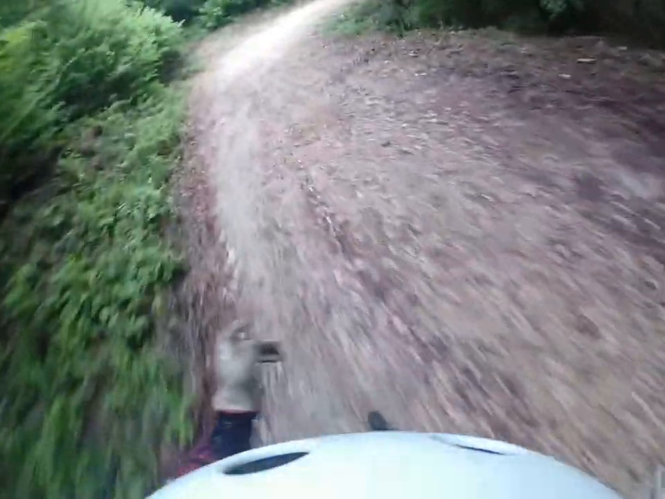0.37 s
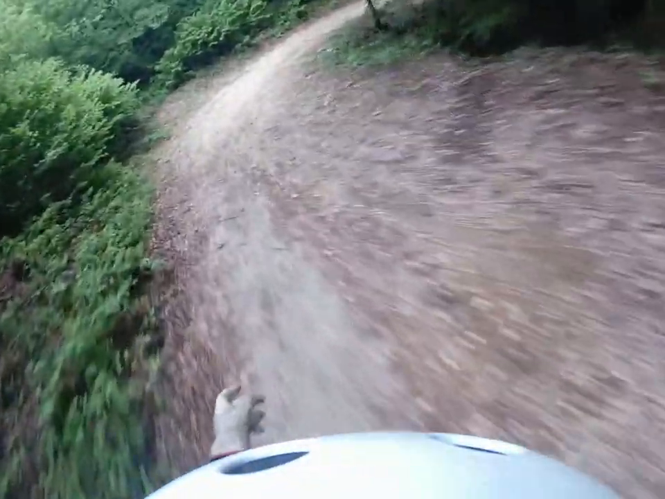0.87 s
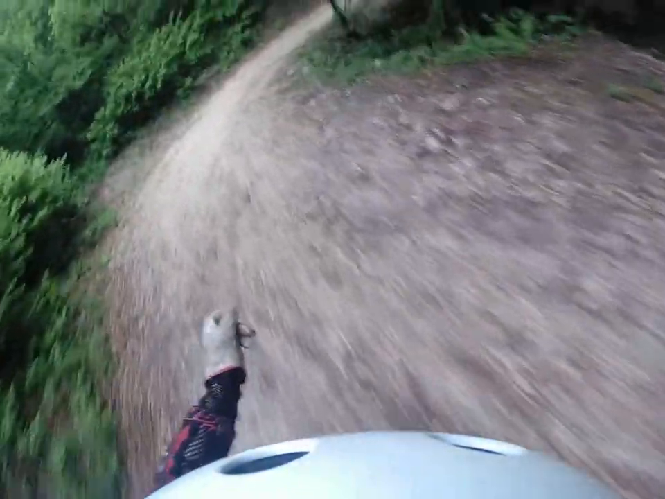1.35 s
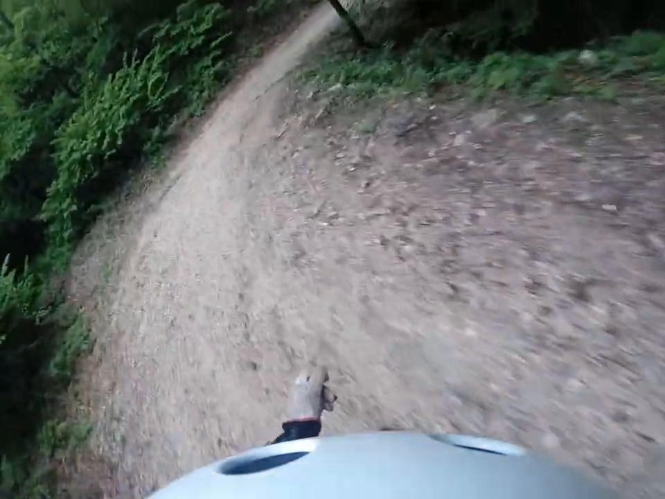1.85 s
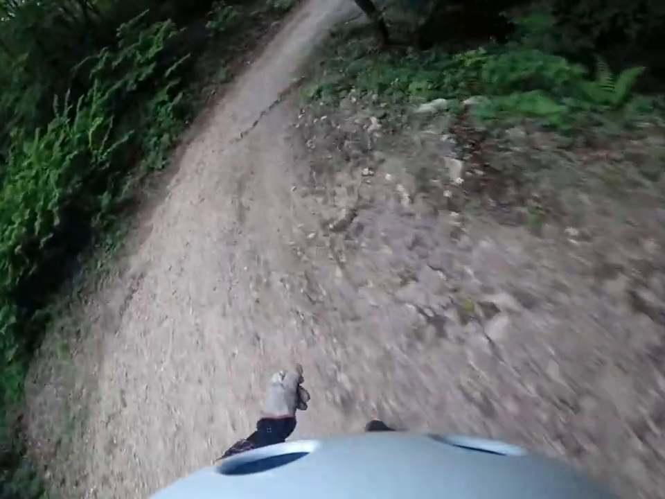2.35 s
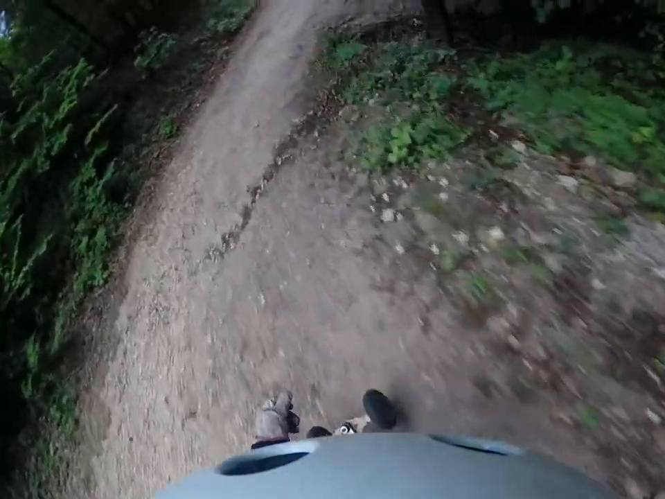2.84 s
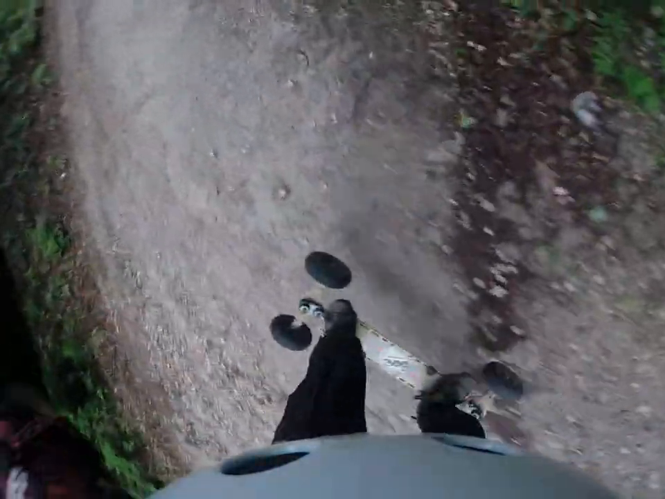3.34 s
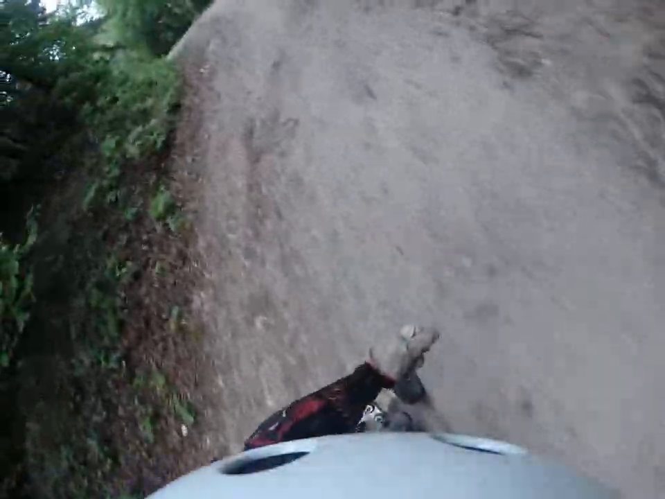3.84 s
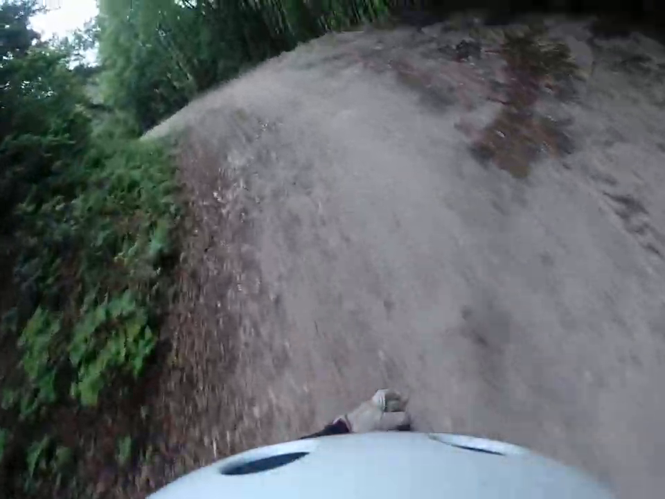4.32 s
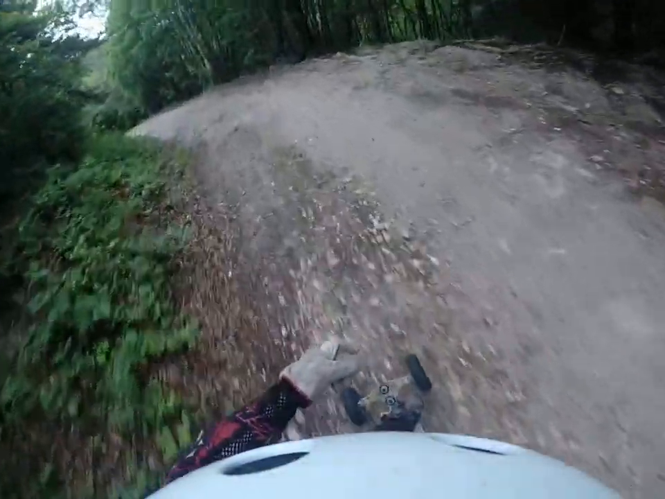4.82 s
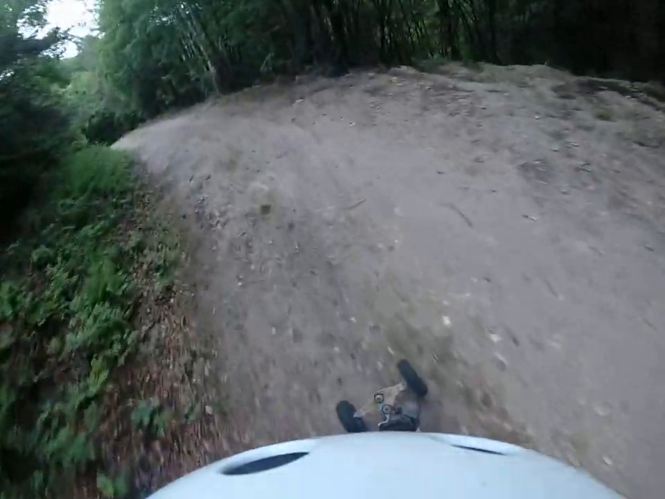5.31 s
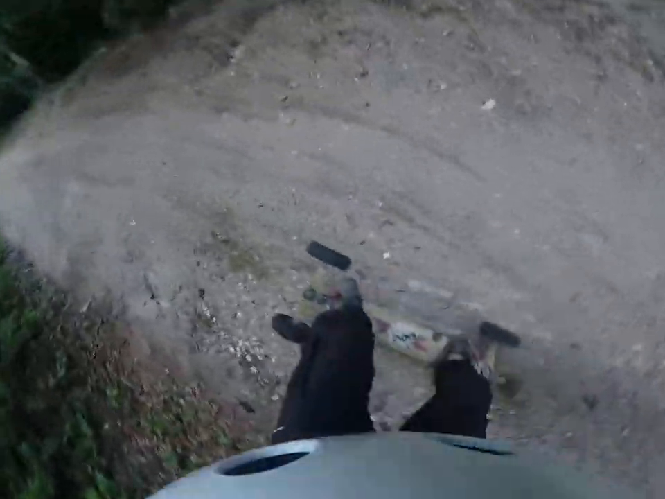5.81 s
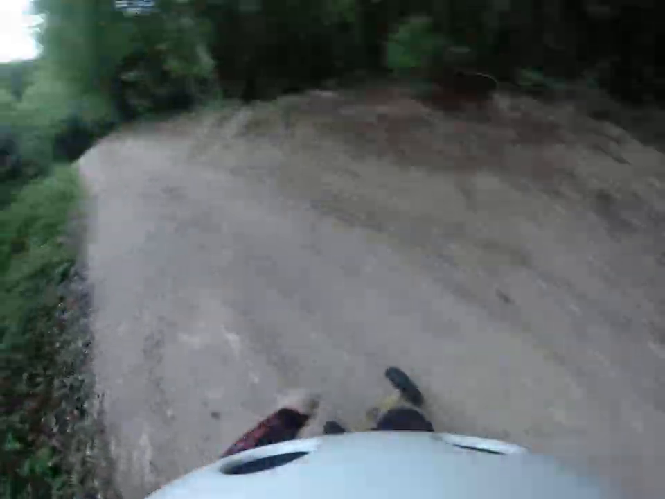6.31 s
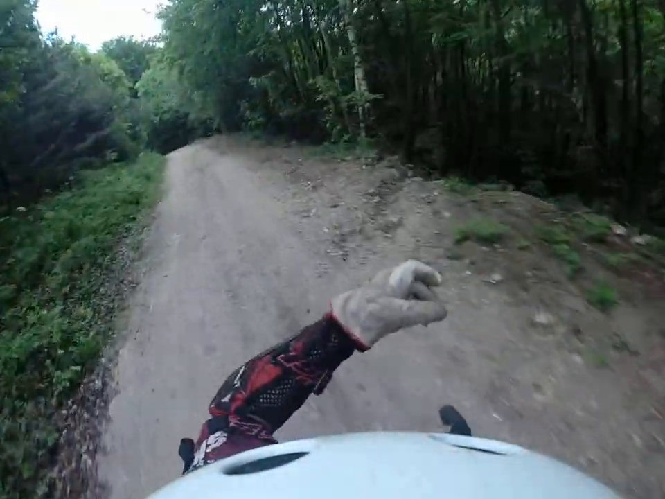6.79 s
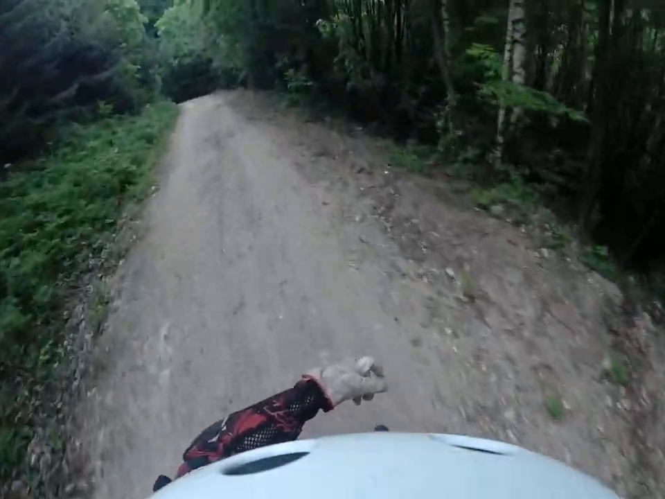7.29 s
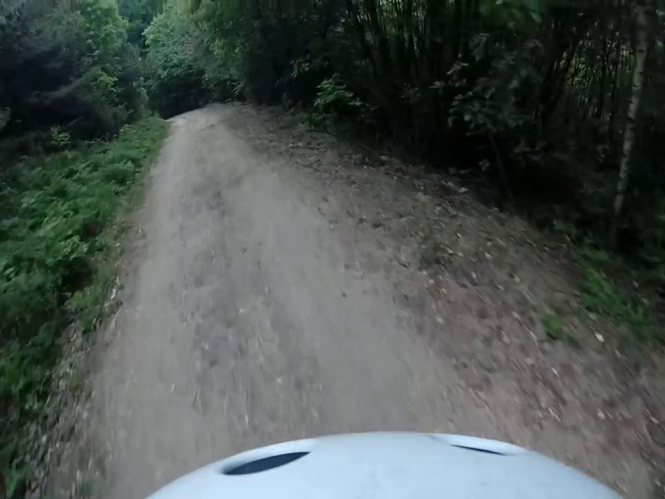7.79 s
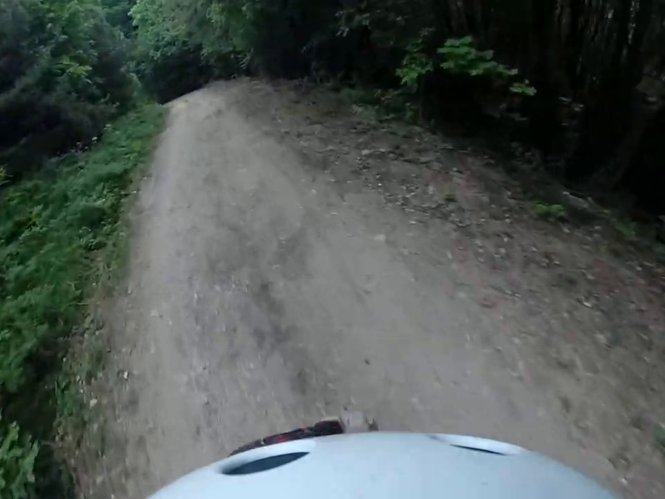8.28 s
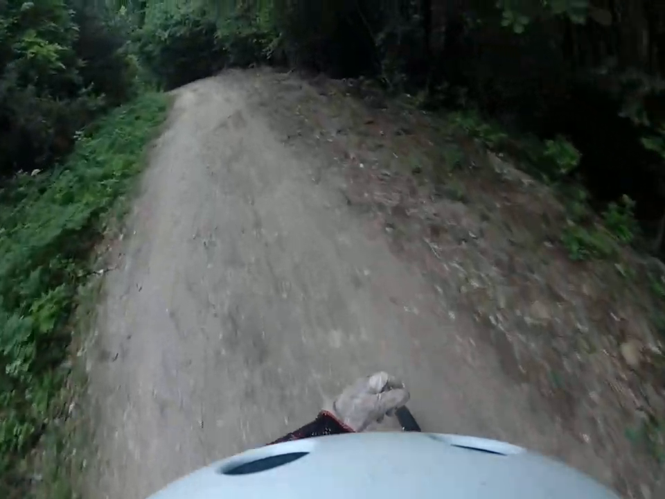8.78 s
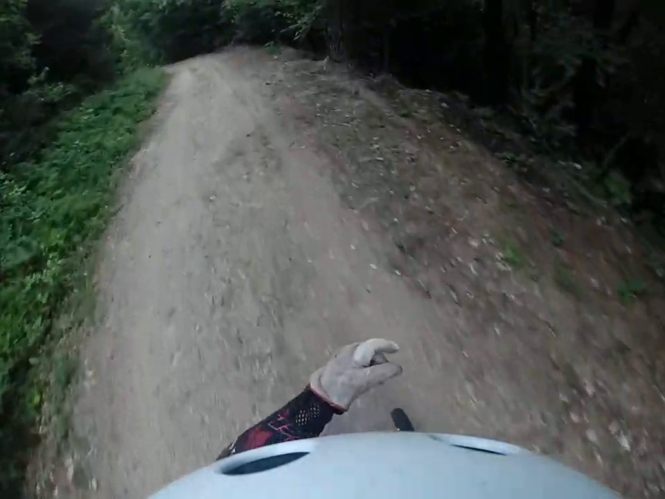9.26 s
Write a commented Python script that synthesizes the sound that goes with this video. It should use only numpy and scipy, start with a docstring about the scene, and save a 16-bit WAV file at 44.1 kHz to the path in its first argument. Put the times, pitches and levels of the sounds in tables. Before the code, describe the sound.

Close, boxy and dull-edged sound of rubber tyres grinding along dirt and loose stones outdoors. Continuous low shaking flutters beneath steady crunching and hissy grit. Irregular deep bumps boom and ring, while small stones tick, knock and clack. Strong hits come near three and a half, four and six seconds; afterwards the ride calms, pressing harder into the gravel around eight seconds before thin hoarse squeaks.

```python
"""Board on a gravel trail

A gravel trail heard from a rider's helmet camera, microphone inside its closed housing, as a board rolls.
Tyres rumble, crunch and throw grit: coloured noise broken into grains, louder as the rider presses down.
Bumps come up through the body as bell-shaped pushes that sway and ring the camera mount; shaking blurs both.
Stones knock and clack on the deck in decaying bursts, dulled by the resonant shell. Late on, a rubber part
squeaks in three brief slips, as sagging hoarse sines.
"""
import sys
import numpy as np
from scipy import signal
from scipy.fft import rfft, irfft, next_fast_len
from scipy.io import wavfile
from scipy.ndimage import uniform_filter1d, map_coordinates

SR = 44100
rng = np.random.default_rng(int(sys.argv[2]) if len(sys.argv) > 2 else 0)


def dump(signal):
    """Clip the signal to [-1, 1] and save it as 16-bit WAV at the path in sys.argv[1]."""
    limited = np.clip(np.atleast_2d(signal).T, -1, 1)
    pcm = np.round(limited * 32767).astype(np.int16)
    wavfile.write(sys.argv[1], SR, pcm)


def gain_from_db(level_db):
    """Convert decibel levels to linear amplitude factors (20 dB per decade)."""
    decades = np.asarray(level_db, float) / 20
    return 10 ** decades


N = 425124


def unit(x):
    """Scaled to rms 1."""
    return x / np.sqrt(np.mean(x ** 2) + 1e-20)


def curves(rows):
    """One value per sample for each column after the time."""
    s, *columns = np.transpose(rows)
    return [np.interp(np.arange(N) / SR, s, column) for column in columns]


def wobble(rate):
    """A smooth random curve, rate knots a second."""
    knots = rng.standard_normal(int(N * rate / SR) + 4)
    return map_coordinates(knots, [np.arange(N) * rate / SR])


def filtered(x, response):
    """x times a complex response of frequency."""
    m = next_fast_len(N + SR // 2)
    return irfft(rfft(x, m) * response(np.fft.rfftfreq(m, 1 / SR)), m)[..., :N]


def colour(points):
    """Gain through (f/Hz, level/dB) points on a log frequency axis, almost nothing outside them."""
    f, db = np.transpose(points)
    return lambda hz: gain_from_db(np.interp(np.log(hz + 1), np.log(f), db, left=-120, right=-120))


def mode(centre_hz, width_hz):
    """One resonance, gain 1 at its centre."""
    return lambda f: 1j * f * width_hz / (centre_hz ** 2 - f * f + 1j * f * width_hz)


def grains(rate, spread_db, life, smooth):
    """Noise of rms 1: short bursts of uneven size, rate a second and life seconds, on a smooth share."""
    chance, size = rng.random((int(rate * N / SR), 2)).T
    kicks = np.bincount((chance * N).astype(int), gain_from_db(-spread_db * np.log(1 - size)), N)
    burst = signal.lfilter([1], [1, -np.exp(-1 / (life * SR))], kicks)
    return unit((unit(burst) + smooth) * rng.standard_normal(N))


def band(noise, t, hz, size):
    """Noise slowed by two running means and lifted to a band around hz."""
    slow = uniform_filter1d(noise, size, axis=1)
    slow = unit(uniform_filter1d(slow, size, axis=1))
    return slow * np.sin(2 * np.pi * hz[:, None] * t)


def strikes(s, db, t60, attack, carrier):
    """Bursts falling 60 dB in t60 seconds, one per time, on a carrier of (random rows, time)."""
    t = np.arange(SR // 20) / SR
    envelope = gain_from_db(db[:, None] - 60 * t / t60) * (1 - np.exp(-t / attack))
    rows = envelope * carrier(rng.standard_normal((len(s), len(t))), t)
    at = (s * SR).astype(int)[:, None] + np.arange(len(t))
    return np.bincount(at.ravel(), rows.ravel(), N)[:N]


def small(level_db, count, over_db, low_hz, high_hz, spread_db):
    """Random small strikes (s, dB, Hz), denser and louder where their gravel level is high."""
    chance, pitch, size = rng.random((count, 3)).T
    passed = np.cumsum(gain_from_db(level_db[:-SR // 10]))
    at = np.searchsorted(passed, chance * passed[-1])
    db = level_db[at] + over_db - spread_db * np.log(1 - .95 * size)
    return at / SR, db, low_hz * (high_hz / low_hz) ** pitch


# resonances of the closed housing around the microphone: [f/Hz, width/Hz, level/dB]
SHELL_MODES = [(313.6, 23, -6.5), (604, 39, -4.5), (853, 23, -6.5), (1626, 470, -3), (2150, 69, -7.5),
               (2408, 200, 2), (2760, 320, -2.5), (4125, 440, -4), (4500, 57, -6), (6010, 840, -5)]


def housing(x):
    """Outside sound reaches the microphone directly and through the resonances of the shell."""
    return filtered(x, lambda f: 0.69 + sum(gain_from_db(db) * mode(hz, w)(f) for hz, w, db in SHELL_MODES))


# the rider presses the wheels into the gravel: [middle t/s, length t/s, load level/dB]
PRESSES = [(0.124, 0.37, 6.5), (0.53, 0.29, 4.5), (0.925, 0.29, 5.5), (1.397, 0.28, 4.5), (1.895, 0.29, 5),
           (2.35, .3, 7), (2.71, 0.24, 5), (3.187, 0.26, 5), (3.666, 0.12, 9), (3.96, 0.22, 3),
           (4.56, 0.27, 3), (5.16, 0.33, 3), (5.756, 0.11, 2.5), (6.318, .14, 8), (6.685, 0.9, 3),
           (7.12, 0.18, 4.5), (7.45, 0.32, 4), (8.141, 0.69, 5.5)]
# wheels light or off the ground: [from t/s, to t/s, drop in level/dB]
HOPS = [(3.386, 3.59, 2.5), (5.82, 6.266, 6)]


def load():
    """Weight on the wheels: the rise in dB in each press and the drop in dB in each hop."""
    edge, lift_s, land_s = 2.05, 0.11, .005  # squareness of a press; time to lift off and to land
    t = np.arange(0, N, 32) / SR
    press = sum(g * np.exp(-np.abs(2 * (t - s) / length) ** edge) for s, length, g in PRESSES)
    hop = sum(g * np.clip((t - a) / lift_s, 0, 1) * np.clip((b - t) / land_s, 0, 1) for a, b, g in HOPS)
    return [np.interp(np.arange(N) / SR, t, v) for v in (press, hop)]


# rolling with the rider's weight at rest: [t/s, crunch level/dB, grit level/dB]
ROLLING = [(0, -48, -54.5), (0.7, -48, -55), (1.15, -49.5, -57), (2.1, -47.5, -53), (2.6, -47.5, -51),
           (3.1, -48, -53.5), (4.1, -48.5, -54.5), (4.8, -51.5, -61.5), (5.6, -50, -58), (6.5, -53, -58.5),
           (7.6, -51.5, -61), (8.4, -51.5, -61.5), (8.65, -47, -57), (9.05, -49.5, -59.5), (9.64, -50, -59)]


def gravel_levels():
    """Low crunch, high crunch and grit in dB: load lifts the brighter parts more, a hop drops all alike."""
    crunch_db, grit_db = curves(ROLLING)
    press, hop = load()
    low_db = crunch_db + .5 * press - hop
    high_db = crunch_db - 1.5 + 1.24 * press - hop
    return low_db, high_db, grit_db + 0.92 * press - hop


def layer(source, spectrum):
    """A source through its colour and the housing, rms 1."""
    return unit(housing(filtered(source, colour(spectrum))))


# colour of the rolling rumble: [f/Hz, level/dB per Hz]
RUMBLE_COLOUR = [(60, -13), (110, -5), (200, -9.5), (400, -15.5), (900, -19.5), (1500, -29.5), (3000, -66)]
# colours of the low and the high crunch, a list for each: [f/Hz, level/dB per Hz]
CRUNCH_COLOURS = [
    [(500, -11), (1100, -2), (1600, 3), (2000, -3), (2600, -50.5)],
    [(1600, -43.5), (2100, -2.5), (2900, 1.5), (3700, -9), (6000, -60.5)],
]
# colour of the bright grit: [f/Hz, level/dB per Hz]
GRIT_COLOUR = [(2500, -30.5), (3500, 10), (6200, 4.5), (7500, -0.5), (10000, -7), (15500, -15.5)]


def tyres():
    """Rolling rumble, crunch of stones under load and bright grit, all swelling on one roughness."""
    low_db, high_db, grit_db = gravel_levels()
    rough = wobble(15)
    rumble_db = -47.5 + 0.64 * (low_db + 48.5) + 0.94 * rough
    rumble = gain_from_db(rumble_db) * layer(grains(150, 3.7, life=0.0044, smooth=3.3), RUMBLE_COLOUR)
    # both parts of the crunch come from the same stones
    stones_crushed = grains(300, 3.8, life=0.004, smooth=3.9)
    low, high = (layer(stones_crushed, part) for part in CRUNCH_COLOURS)
    low = gain_from_db(low_db + 0.34 * wobble(22)) * low
    high = gain_from_db(high_db + 0.35 * wobble(23)) * high
    crunch = gain_from_db(1.06 * rough) * (low + high)
    grit_db = grit_db + 0.5 * rough + 1.22 * wobble(25)
    grit = gain_from_db(grit_db) * layer(grains(400, 2.75, life=0.0016, smooth=2.25), GRIT_COLOUR)
    return rumble + crunch + grit


# sway from small bumps and wind, before load and flutter: [t/s, level/dB]
SHAKE_SWAY = [(0, -32), (1.4, -30.5), (3.1, -26.5), (4, -30), (5.2, -34.5), (5.7, -25.5), (6, -32),
              (6.45, -28.5), (6.9, -36), (7.5, -31.5), (9, -31.5), (9.64, -30)]
# sway and ring of the mount, blurred under constant shaking: [f/Hz, width/Hz]
SHAKEN_MODES = [(25, 28), (93, 21.5)]


def shaking():
    """Constant shaking, as fluttering noise, keeps both resonances of the mount alive."""
    (press, hop), flutter = load(), wobble(16)
    sway_db = curves(SHAKE_SWAY)[0] + 0.17 * press - hop
    out = 0
    for (hz, width), db in zip(SHAKEN_MODES, (sway_db, sway_db - 7.5)):
        # two resonances in a row, rolled off above 130 Hz
        twice = lambda f: mode(hz, width)(f) * mode(hz, 2 * width)(f) * np.exp(-(f / 130) ** 2)
        shaken = gain_from_db(3.0 * flutter + 1.2 * wobble(8.9)) * rng.standard_normal(N)
        out = out + gain_from_db(db) * unit(filtered(shaken, twice))
    return out


def pushes(s, up, width_ms, db, centre_hz, width_hz):
    """Bell-shaped pushes through one resonance; a very short push starts it ringing at db."""
    sigma = np.clip(width_ms[:, None] / 1000, 2e-4, .01)
    t = np.arange(-2000, 2000) / SR
    bell = np.exp(-t ** 2 / (2 * sigma ** 2)) / (sigma * np.sqrt(2 * np.pi))
    size = np.sign(up) * gain_from_db(db) / (2 * np.pi * width_hz)
    at = ((s[:, None] + t) * SR).round().astype(int)
    force = np.bincount(at.ravel(), (size[:, None] * bell).ravel(), N)[:N]
    return filtered(force, mode(centre_hz, width_hz))


# bumps, levels before the gains below: [t/s, direction up 1 or down -1, sway level/dB, ring level/dB]
BUMPS = [(0.127, 1, -13, -18), (0.175, -1, -14, -22), (0.545, -1, -3.5, -29.5), (0.648, 1, -7, -21.5),
         (0.957, 1, 0.5, -13.5), (1.394, -1, -7, -23), (1.48, 1, -4, -32.5), (1.82, 1, -2, -14.5),
         (1.886, -1, -7.5, -14.5), (2.258, 1, -2.5, -13), (2.292, 1, -4.5, -11), (2.661, 1, -7, -33),
         (2.705, -1, -2, -26.5), (3.061, 1, -4, -13), (3.246, -1, -0.5, -30), (3.639, 1, -5, -5.5),
         (3.774, 1, -6.5, -41), (4.097, -1, -43, -7.5), (4.106, 1, -27, 0), (4.701, -1, -5, -36.5),
         (5.149, 1, -5.5, -7.5), (5.522, -1, -9.5, -25.5), (5.733, -1, -16.5, -13), (5.786, 1, -23, -16.5),
         (6.312, 1, 1, -10.5), (6.348, 1, -18, -12.5), (6.551, -1, -7.5, -46), (7.56, 1, -12, -34.5),
         (7.66, -1, -11.5, -40), (7.88, 1, -12.5, -38)]
# sway and ring of the camera mount, one row each: [f/Hz, width/Hz]
MOUNT_MODES = [(32, 12.6), (92, 9.9)]
# upper mount resonances, reached only by sharp pushes: [f/Hz, width/Hz, level above ring/dB]
RATTLE_MODES = [(172, 80, 6), (312, 22, 2)]


def bumps():
    """Each bump pushes the mount, which sways slowly, rings low and, if the push is sharp, rattles."""
    s, up, sway_db, ring_db = np.transpose(BUMPS)
    (sway_hz, sway_width), (ring_hz, ring_width) = MOUNT_MODES
    ms = 3.045 * np.exp(-.02 * (ring_db - sway_db))  # the more a push rings, the shorter it is
    # what a wide push loses at the ring
    soft_db = 20 * np.log10(np.e) * (2 * np.pi * ring_hz * ms / 1000) ** 2 / 2
    sway = pushes(s, up, 2.03 * ms, sway_db + 9, sway_hz, sway_width)
    ring = pushes(s, up, 0.92 * ms, ring_db + soft_db, ring_hz, ring_width)
    rattle = sum(pushes(s, up, 0.68 * ms, ring_db + db, hz, width) for hz, width, db in RATTLE_MODES)
    return sway + ring + rattle


# grit flung against something hard, levels before the gain below: [t/s, level/dB, centre f/Hz]
FLUNG_GRIT = [(0.304, -30, 5540), (1.927, -38, 9000), (2.057, -33.5, 9000), (2.37, -27, 6100),
              (2.388, -17.5, 4950), (2.394, -17, 4350), (2.401, -27, 6500), (2.495, -28, 7960),
              (2.819, -32, 8100), (3.41, -26, 8600), (3.555, -33.5, 7100), (6.265, -32, 11900),
              (6.315, -25.5, 4760), (6.575, -27, 5320), (6.901, -36, 5950), (7.002, -35, 4720),
              (8.149, -43, 9900)]


def grit_ticks():
    """Flung grit only ticks: very short bands of high noise, heard through the housing."""
    _, _, grit_db = gravel_levels()
    random_ticks = small(grit_db, count=70, over_db=9, low_hz=4500, high_hz=12000, spread_db=3.5)
    s, db, hz = np.hstack([np.transpose(FLUNG_GRIT), random_ticks])
    tick = strikes(s, db + 2.5, 0.01, 0.00068, lambda noise, t: band(noise, t, hz, size=6))
    return housing(filtered(tick, lambda f: 1 - np.exp(-(f / 3500) ** 4)))


# stones on the deck, levels before the gains below: [t/s, clack level/dB, clack f/Hz, knock level/dB]
DECK_STONES = [(1.441, -33, 1530, -36.5), (1.613, -32, 1880, -32.5), (2.3927, -20.5, 2150, -54.5),
               (2.4326, -17, 2445, -56), (2.575, -26, 2880, -36), (2.6234, -27, 1580, -36),
               (2.9091, -21, 2335, -37), (3.097, -32, 1400, -33), (3.197, -30.5, 2110, -41),
               (3.231, -25.5, 2370, -34), (3.239, -29.5, 1420, -34.5), (3.2822, -23, 1640, -30.5),
               (3.2908, -29, 1410, -30), (3.305, -28, 2000, -32.5), (3.3182, -30, 2430, -36),
               (3.637, -28.5, 2760, -31), (3.674, -26, 2310, -50), (3.751, -26.5, 1738, -38),
               (3.96, -32, 1577, -33), (4.095, -19.5, 1310, -20.5), (4.1033, -23.5, 2390, -34),
               (4.367, -22.5, 2290, -40), (4.3758, -23.5, 1645, -32.5), (5.65, -28.5, 1654, -46),
               (5.749, -19, 2115, -51), (5.7566, -21, 2200, -37), (5.7723, -22.5, 2406, -29.5),
               (6.2665, -36, 1660, -54), (6.313, -16, 2240, -32), (6.3763, -29, 1570, -32),
               (6.573, -30, 2740, -61), (7.001, -23, 2940, -68), (7.3382, -28.5, 1494, -38),
               (7.3455, -28.5, 2280, -37.5)]
# colour of the dull knock: [f/Hz, level/dB per Hz]
KNOCK_COLOUR = [(100, -13), (200, -5.5), (350, 6.5), (900, -0.5), (1800, -11)]


def stones():
    """A strike on the deck is a dull knock and a pitched clack with a wide crack, through the housing."""
    low_db, _, _ = gravel_levels()
    s, db, hz = small(low_db, count=25, over_db=12, low_hz=1400, high_hz=2800, spread_db=2.5)
    s, db, hz, knock_db = np.hstack([np.transpose(DECK_STONES), [s, db, hz, db - 14.5]])

    def ping(noise, t):
        tone = np.sin(2 * np.pi * hz[:, None] * t)
        return 0.49 * tone + 0.5 * band(noise, t, hz, size=14)

    clack = strikes(s, db - .6, 0.029, 0.00082, ping)
    crack = strikes(s, db - 3.0, .018, 0.00043, lambda noise, t: band(noise, t, hz, size=6))
    thud = strikes(s, knock_db + 19.5, 0.041, 0.0032, lambda noise, t: noise)
    knock = filtered(thud, colour(KNOCK_COLOUR))
    dull = filtered(clack + crack, lambda f: np.exp(-(f / 4800) ** 4))
    return housing(dull + knock)


# slips of the rubber, levels before the gain below: [start t/s, length t/s, start f/Hz, level/dB]
SLIPS = [(8.558, .075, 1075, -39), (8.645, .045, 1040, -52), (8.708, .085, 990, -43)]


def squeak():
    """Rubber slips briefly: thin hoarse tones that sag, unsteady in pitch and size."""
    rest_hz, settle_s = 980, .06  # each slip sags toward this pitch
    t, out = np.arange(N) / SR, 0
    waver = 1 + .02 * wobble(90)
    size = gain_from_db(3 * wobble(60)) * (1 + .35 * wobble(400))
    for s, length, start_hz, db in SLIPS:
        hz = rest_hz + (start_hz - rest_hz) * np.exp(-np.abs(t - s) / settle_s)
        phase = 2 * np.pi * np.cumsum(hz * waver) / SR
        swell = np.sin(np.pi * np.clip((t - s) / length, 0, 1)) ** .6
        out = out + gain_from_db(db + 3) * swell * np.sin(phase)
    return size * out


def scene():
    """Everything meets at the one microphone in the housing."""
    return (tyres() + shaking() + bumps() + grit_ticks() + stones() + squeak())[None]


def band_limit(x):
    """A steep low-pass at the top of the band."""
    return signal.sosfilt(signal.butter(12, 15610, fs=SR, output="sos"), x)


def record(dry):
    """The finished mix, with nothing kept above 15.5 kHz."""
    mix = filtered(dry, lambda hz: hz < 15500)
    return band_limit(mix)


dry = scene()
out = record(dry)
dump(out)
```